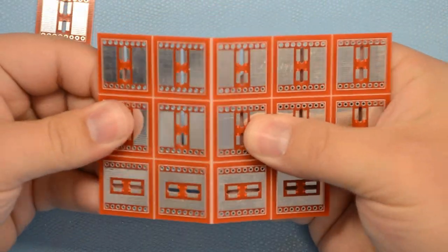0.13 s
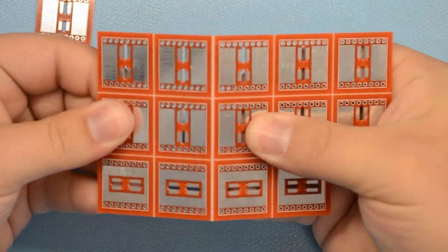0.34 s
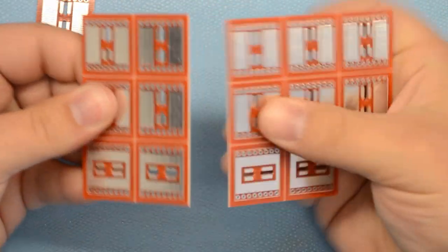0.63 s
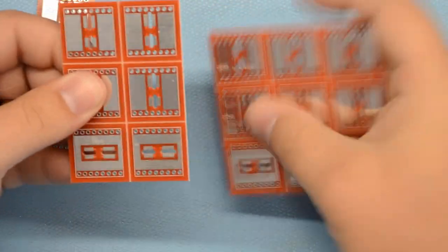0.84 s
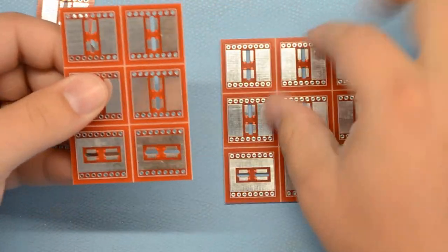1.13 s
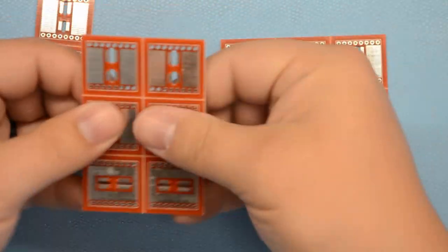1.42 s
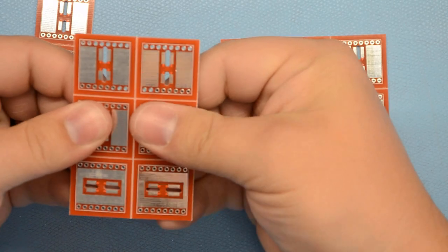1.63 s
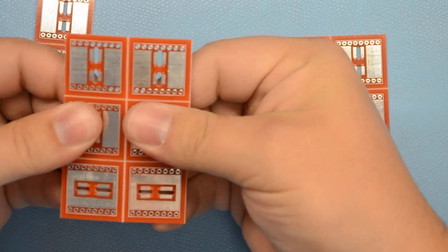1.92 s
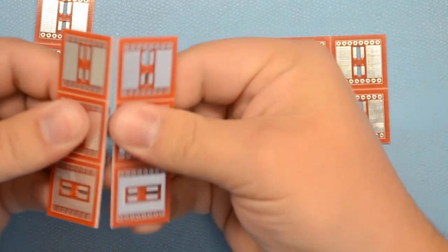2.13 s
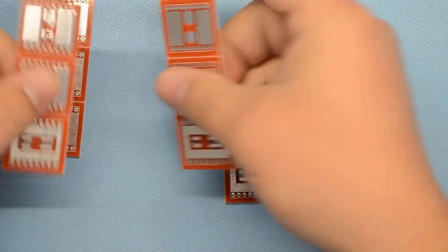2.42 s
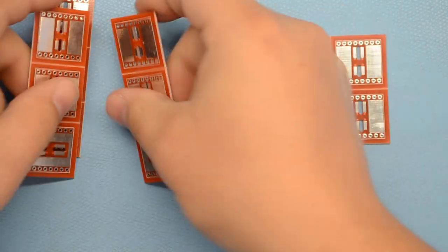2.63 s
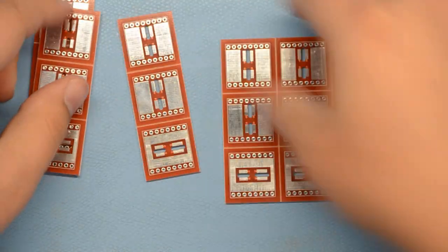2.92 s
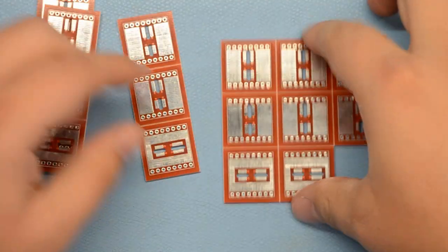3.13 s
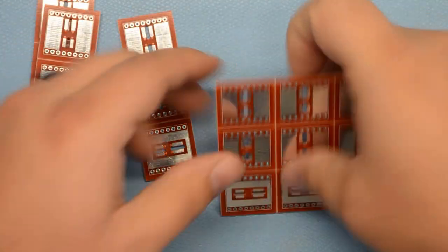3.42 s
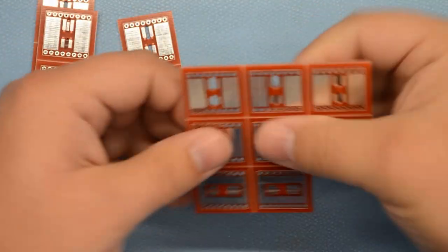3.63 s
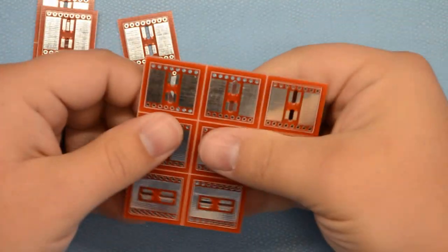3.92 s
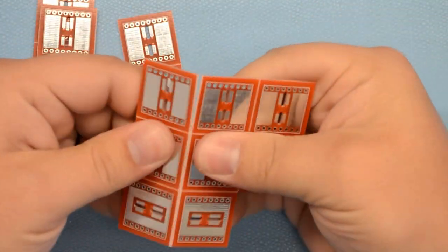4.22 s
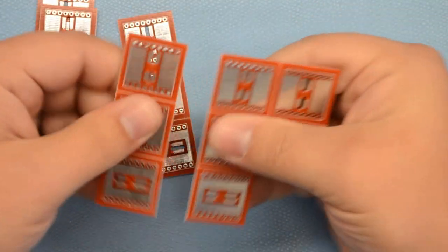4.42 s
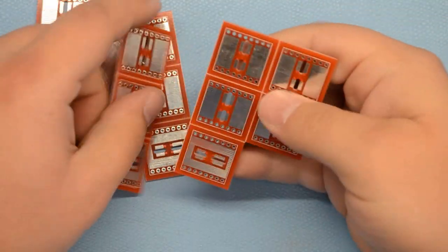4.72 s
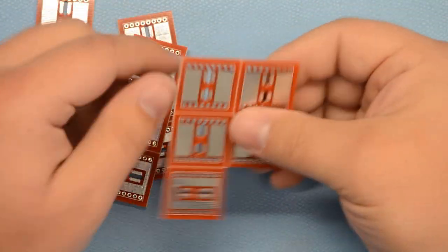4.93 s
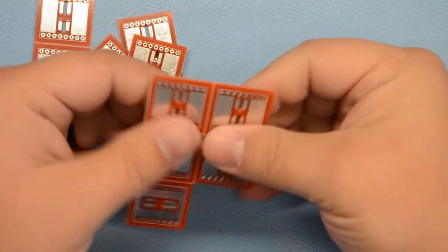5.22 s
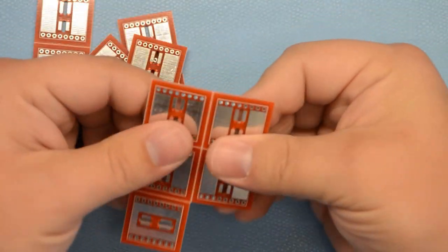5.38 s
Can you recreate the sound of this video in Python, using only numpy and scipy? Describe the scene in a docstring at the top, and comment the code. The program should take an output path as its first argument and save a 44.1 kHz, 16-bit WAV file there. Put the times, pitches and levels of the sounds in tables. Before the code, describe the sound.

Fibreglass circuit board panel is snapped by hand with sharp dry cracks, the broken strips slapping and clattering onto a table in a small room.

```python
"""Snapping a panel of circuit boards

At a table in a small dry room, a small microphone close by: hands bend a fibreglass panel until it cracks
along its scored lines. Cracks and landing strips are rough pushes that ring the board and the room;
tearing fibres, sliding skin and scraping boards are random clicks under swelling gains. Brief tones and
a lasting table ring are narrow noise, thuds and chimes are decaying sines, ventilation is coloured noise.
"""
import sys
import numpy as np
from scipy import signal
from scipy.fft import rfft, irfft, next_fast_len
from scipy.io import wavfile
from scipy.ndimage import uniform_filter1d

SR = 44100
rng = np.random.default_rng(int(sys.argv[2]) if len(sys.argv) > 2 else 0)


def convert_level_to_amplitude(level_db):
    """Map a level in decibels to its linear amplitude factor."""
    exponent = np.asarray(level_db, float) / 20
    return 10 ** exponent


def dump(signal):
    """Clip the signal to [-1, 1] and save it as 16-bit WAV at the path in sys.argv[1]."""
    limited = np.clip(np.atleast_2d(signal).T, -1, 1)
    pcm = np.round(limited * 32767).astype(np.int16)
    wavfile.write(sys.argv[1], SR, pcm)


N = 244755
T = np.arange(N) / SR
CENTRES = 100 * 2 ** np.arange(0, 7.5, .5)  # half-octave bands, Hz


def shape(x, gain_at):
    """Filter by a gain given as a function of frequency."""
    size = next_fast_len(len(x) + 4096)
    hz = np.arange(size // 2 + 1) * SR / size + 1e-3  # keeps the logarithm finite at 0 Hz
    return irfft(rfft(x, size) * gain_at(hz), size)[:len(x)]


def colour(points):
    """Gain joined by straight lines over log frequency, from (Hz, dB) points."""
    hz, db = np.transpose(points)
    return lambda f: convert_level_to_amplitude(np.interp(np.log(f), np.log(hz), db))


def bumps(peaks):
    """Gain of a few bell-shaped peaks or dips, each (Hz, width Hz, dB)."""
    return lambda f: convert_level_to_amplitude(sum(db / (1 + (2 * (f - hz) / width) ** 2) for hz, width, db in peaks))


def resonate(x, peaks):
    """Causal bell-shaped boosts and cuts, each (Hz, width Hz, dB)."""
    for hz, width, db in peaks:
        x = x + (convert_level_to_amplitude(db) - 1) * signal.lfilter(*signal.iirpeak(hz, hz / width, SR), x)
    return x


def band(x, lo_hz, hi_hz):
    """Causal band-pass."""
    return signal.sosfilt(signal.butter(2, [lo_hz, hi_hz], "band", fs=SR, output="sos"), x)


def unit(x):
    """Scale to rms 1."""
    return x / np.sqrt(np.mean(x ** 2))


def energy(x, db):
    """Scale to an energy level."""
    return x * convert_level_to_amplitude(db) / np.sqrt(np.sum(x ** 2))


def peak(x, db):
    """Scale to a peak level."""
    return x * convert_level_to_amplitude(db) / np.abs(x).max()


def add(out, s, x):
    """Mix a sound in at a time."""
    i = int(s * SR)
    out[i:i + len(x)] += x[:N - i]


# Tone of the room's moving air. Each row: frequency in Hz, relative level in dB.
AIR_COLOUR = [(15, -33), (25, -18), (59, 1), (92, -0.5), (236, -5), (263, -3.5), (818, -2.5), (887, -6.5),
              (962, -7.5), (1610, -5.5), (2050, -9), (2410, -8.5), (5570, -20), (8140, -25), (16000, -40)]
# Broad resonances of that air. Each row: frequency in Hz, width in Hz, boost in dB.
AIR_RESONANCES = [(60, 9.6, 1), (244, 33, 7.5), (775, 50, 2), (1079, 81, 9), (2065, 190, 9.5)]


def air():
    """Steady ventilation hiss: coloured noise with a few broad resonances."""
    hiss = shape(rng.standard_normal(N), colour(AIR_COLOUR))
    return convert_level_to_amplitude(-61) * unit(shape(hiss, bumps(AIR_RESONANCES)))


def grains(per_s, spread_db):
    """Random clicks of uneven size, rms 1."""
    happens = rng.random(N) < per_s / SR
    size = rng.standard_normal(N) * convert_level_to_amplitude(spread_db * rng.exponential(size=N))
    return unit(happens * size)


def stroke(start, length, db, rise, fall):
    """Gain that rises 30 dB to the start, sags as the motion slows and falls 30 dB after the end."""
    slowing_db_per_s = 36.5
    t = T - start
    slope = 30 * (np.minimum(t, 0) / rise - np.maximum(t - length, 0) / fall)
    return convert_level_to_amplitude(db + slope - slowing_db_per_s * np.clip(t, 0, length))


def judder():
    """Uneven pressure: random gain steps, smoothed at their joins."""
    spread_db, steps_per_s = 3.5, 45
    k = int(SR / steps_per_s)
    steps = np.repeat(rng.standard_normal(N // k + 1), k)
    return convert_level_to_amplitude(spread_db * uniform_filter1d(steps, k // 2)[:N])


LIFT_S = .05  # time for skin or board to fade 30 dB after a stroke

# Fingers sliding on the boards. Each row: start in seconds, length in seconds, level at the start in dB.
SLIDES = [(.01, 0.044, -74), (.14, 0.088, -71), (.37, 0.074, -75), (.69, 0.033, -62.5), (.78, 0.089, -66.5),
          (.95, .11, -58), (1.2, 0.18, -68), (1.735, 0.013, -70), (1.79, 0.16, -73), (2.18, .12, -80),
          (2.33, .28, -68.5), (2.62, 0.096, -78.5), (2.725, .03, -69.5), (3.043, .015, -74),
          (3.082, 0.018, -73), (3.138, 0.061, -68), (3.25, 0.088, -74), (3.345, 0.096, -67.5),
          (3.47, 0.018, -55.5), (3.53, 0.18, -72), (3.77, 0.046, -75), (3.9, .04, -71),
          (4.25, 0.051, -52.5), (4.45, 0.046, -82), (4.505, 0.029, -69.5), (4.55, 0.093, -77),
          (4.88, 0.074, -66), (5.03, 0.018, -58), (5.205, 0.013, -72), (5.37, 0.068, -77.5)]
# Fibres tearing ever louder as a bend tightens.
# Each row: time of the break in seconds, level there in dB, build-up (the last 30 dB) in seconds.
BENDS = [(0.083, -56, 0.044), (0.491, -55.5, 0.05), (1.995, -60, 0.1), (4.182, -49, 0.13),
         (5.471, -57, 0.055)]
# Tone of fibres and skin heard close. Each row: frequency in Hz, relative level in dB.
RUB_COLOUR = [(300, -41.5), (1500, -9.5), (3000, -14.5), (6000, 1.5), (8500, 3), (12000, -20.5),
              (16000, -28.5)]


def rubbing():
    """Fine crackle of tearing fibres and sliding skin: dense clicks under swelling gains."""
    crackle = unit(shape(grains(per_s=9000., spread_db=1.5), colour(RUB_COLOUR)))
    tearing = sum(stroke(s, 0, db, rise=build, fall=.037) for s, db, build in BENDS)
    skin = judder() * sum(stroke(*row, rise=.05, fall=LIFT_S) for row in SLIDES)
    return crackle * (tearing + skin)


# Fall of the room's reflections. Each row: frequency in Hz, time to fall 60 dB in seconds.
ROOM_T60 = [(150, .22), (500, 0.22), (1400, 0.15), (3700, .14), (8000, 0.14), (13000, 0.042)]


def diffuse(t):
    """Reflections by half octave, energy 1 each: quick to build up, and fading at each band's own rate."""
    onset_ms = 0.28
    hz, t60 = np.transpose(ROOM_T60)
    decay = convert_level_to_amplitude(-60 * t / np.interp(np.log(CENTRES), np.log(hz), t60)[:, None])
    noise = rng.standard_normal((len(CENTRES), len(t)))
    bands = np.array([band(v, f / 1.2, f * 1.2) for v, f in zip(noise, CENTRES)])
    tail = bands * decay * (1 - np.exp(-t / (onset_ms / 1000)))
    return tail / np.sqrt(np.sum(tail ** 2, axis=1, keepdims=True))


def room(x):
    """The small room's answer to the sustained sounds and chimes: one diffuse tail."""
    return signal.fftconvolve(x, energy(diffuse(T[:SR // 4]).sum(0), -8.5))[:N]


def tint(push, gain_at, size=4096):
    """Give a short push a set energy per half octave with a causal (minimum-phase) filter."""
    spectrum = rfft(push[:size], size)
    hz = np.arange(1, len(spectrum) + 1) * SR / size
    own = np.sqrt(uniform_filter1d(np.abs(spectrum) ** 2, size=60))
    # Even energy per half octave falls as 1 / sqrt(Hz); below the lowest band it rolls off.
    wanted = gain_at(hz) * np.minimum(hz / CENTRES[0], 1) / np.sqrt(hz)
    cepstrum = irfft(np.log(wanted / own), size)
    fold = np.r_[1, 2 * np.ones(size // 2 - 1), 1, np.zeros(size // 2 - 1)]
    tinted = irfft(spectrum * np.exp(rfft(cepstrum * fold)), size)
    return np.pad(tinted, (0, len(push) - size))


def ring(modes, push):
    """Damped modes struck by a push; each blow lands elsewhere, so strength, sign and pitch vary."""
    hz, db, t60 = np.transpose(modes)[:, :, None]
    strength, detune, sign = rng.standard_normal((3, len(modes), 1))
    t = T[:SR // 16]
    tone = np.sin(2 * np.pi * hz * (1 + 0.012 * detune) * t)
    response = convert_level_to_amplitude(db + 0.62 * strength) * tone * convert_level_to_amplitude(-60 * t / t60)
    return signal.fftconvolve(push, (np.sign(sign) * response).sum(0))[:len(push)]


# Bending modes of a board. Each row: frequency in Hz, level in dB, time to fall 60 dB in seconds.
BOARD = [(430, -8, .03), (610, -5, .03), (720, -2, .03), (790, -1, .035), (965, -1, .04), (1075, -1, .035),
         (1200, -2, .03), (1320, -2, .03), (1450, -2, .03), (1620, -1, .035), (1700, -3, .03),
         (1840, -3, .03), (2080, -5, .03), (2250, -7, .025), (2490, -6, .025), (2880, -7, .025),
         (3200, -9, .02), (3650, -8, .02), (4000, -10, .02), (4300, -11, .02), (4900, -14, .02)]


def blows(events, ring_db):
    """Each blow is a short rough push: thump, crack and ring of the board, and reflections from where it fell."""
    echo_db = -2.5
    out, t = np.zeros(N), T[:SR // 4]
    for s, db, thump_db, body_db, treble_db, ms in events:
        tau = np.clip(ms, .2, 3.5) / 1000
        push = rng.standard_normal(len(t)) * np.exp(-t / tau) * np.minimum(t / 0.00078, 1)
        gain_at = colour([
            (100, thump_db + 2.5), (350, thump_db + 15),
            (900, body_db + 11), (1800, body_db + 14.5), (3500, 1.6),
            (6400, treble_db + 14.5), (9000, treble_db + 14),
            (12800, treble_db - 10.0), (16000, treble_db - 12.5)])
        direct = energy(tint(push, gain_at), 0) * np.linalg.norm(gain_at(CENTRES))
        board = energy(band(ring(BOARD, push), 270.0, 12000.0), body_db + ring_db)
        echo = convert_level_to_amplitude(echo_db) * gain_at(CENTRES) @ diffuse(t)
        add(out, s, convert_level_to_amplitude(db) * (direct + board + echo))
    return out


# Fractures along a score line. Each row: start in seconds, level in dB, board ring in dB, treble in dB,
# decay time of the burst in ms (held within 0.2 to 3.5 when played).
CRACKS = [(.087, -32.5, -40.5, -0.5, 4.2), (0.0906, -36, -22, 7.5, 3.2), (.0952, -26.5, -18, -11, .56),
          (.175, -64.5, -16, 10, .6), (0.491, -51, -15, 8, 4.8), (.499, -30, -17, -13.5, 6.3),
          (.506, -29, -20, -10.5, 4.1), (.512, -34, -18, -23, 1.5), (1.999, -41, -15, -4.5, .9),
          (2.0043, -4.5, -16.5, -7, .56), (2.021, -11, -20.5, -2.5, 1.6), (4.138, -44.5, -15.5, -6, .63),
          (4.154, -43.5, -17.5, -11.5, 0.56), (4.163, -38, -12.5, -6.5, 2.4), (4.178, -42, -15.5, -16, 3.),
          (4.184, -32.5, -15, -4, 2.1), (4.1887, -17.5, -5, -4, 0.64), (4.217, -26, -15.5, -6.5, 2.7),
          (4.221, -7.5, -17, -9.5, 0.81), (4.280, -34, -18.5, -5, 3), (4.295, -35.5, -15.5, -16, 0.71),
          (4.312, -37, -18, -17, 0.76), (4.501, -29, -21.5, -13.5, 1.1), (5.019, -53, -7, -7, 0.75),
          (5.0435, -43.5, -8.5, -12.5, 2), (5.4772, -6, -15.5, -5.5, .84), (5.4908, -11, -13, -5.5, 1.1)]
# Broad resonances of a board held at both ends. Each row: frequency in Hz, width in Hz, boost in dB.
CRACK_TONE = [(1080, 440, 1), (1730, 320, -1.5), (2810, 590, 4), (3740, 660, -4), (10000, 1200, 1.5),
              (11310, 1200, -4.5)]


def cracks():
    """A board breaking in the hands: sharp pushes with little thump, coloured by the held board."""
    thump_db = -31.5
    events = [(s, db, thump_db, *rest) for s, db, *rest in CRACKS]
    return resonate(blows(events, ring_db=10), CRACK_TONE)


# Hands and boards jolting the table under the microphone. Each row: start in seconds, level in dB.
THUDS = [(0.092, -48), (0.892, -53), (1.07, -39), (2.003, -43.5), (3.051, -56), (3.087, -49.5),
         (4.185, -66), (5.475, -44)]


def thuds():
    """The table top's low bounce, carried straight to the microphone: a decaying sine."""
    bounce_hz, t60_s = 60., 0.091
    out, t = np.zeros(N), T[:SR // 4]
    for s, db in THUDS:
        add(out, s, convert_level_to_amplitude(db) * np.sin(2 * np.pi * bounce_hz * t) * convert_level_to_amplitude(-60 * t / t60_s))
    return out


# Brief narrow wavering tones, one or several at once.
# Each row: start in seconds, length in ms, list of tones (frequency in Hz, rms in dB before the swell).
TONES = [(0.678, 50.2, [(6300, -55.5)]), (0.975, 85., [(2600, -60), (3050, -58)]),
         (3.409, 55.8, [(4400, -66)]), (3.462, 40., [(1250, -52.5), (3400, -60), (4300, -59), (7000, -74)])]


def tones():
    """Brief narrow wavering tones under a smooth swell: band-passed noise."""
    out = np.zeros(N)
    for s, ms, pitches in TONES:
        n = int(ms * SR / 1000)
        for hz, db in pitches:
            settled = band(rng.standard_normal(2 * n), hz * .94, hz * 1.06)[n:]
            add(out, s, convert_level_to_amplitude(db) * np.hanning(n) * unit(settled))
    return out


# Strips landing on the table or the pile. Each row: start in seconds, level in dB, low thump in dB,
# board ring in dB, treble in dB.
TAPS = [(.8878, -25, -3.5, -9.5, -18.5), (.896, -34, 7.5, -22, -26), (.945, -45.5, -9.5, -2, -8),
        (1.0105, -36.5, -19, -5.5, -23.5), (1.022, -37.5, -8, -7, -26), (1.0708, 9, -29.5, -9.5, -28.5),
        (1.0742, -2.5, -26.5, -4.5, -30), (2.629, -48.5, -12, -2.5, -30), (2.728, -44.5, -17.5, -0.5, -29),
        (2.752, -29, -9, -5, -18.5), (2.761, -4, -22.5, -6, -20), (2.7712, -8, -24, -5, -6.5),
        (3.047, -35, -3.5, -13, -26.5), (3.083, -35, -12.5, -21.5, -20.5), (3.140, -50.5, -4.5, -10.5, -7),
        (3.3445, -41, -1.5, -6, -27), (4.705, -33.5, -11.5, 0, -21), (4.722, -24, -19, -18, -10),
        (4.7245, -16.5, -22.5, -22, -14.5), (4.754, -24.5, -13, -3, -8.5), (4.7655, -13, -21, -8.5, -5),
        (4.774, -22.5, -27, -1, -7), (4.82, -29.5, -22, 1.5, -3.5)]
# Broad resonances of a board lying on the mat. Each row: frequency in Hz, width in Hz, boost in dB.
SLAP_TONE = [(150, 120, -3.5), (545, 250, 2.5), (1000, 400, 3), (2300, 500, -4.5), (3400, 800, 2)]


def landings():
    """Dropped strips: pushes coloured by the board on the mat; softer landings touch longer, within limits."""
    contact_ms, contact_ms_per_db = 1.3, 0.74  # the first at 0 dB, before blows() limits it
    events = [(*row, contact_ms - contact_ms_per_db * row[1]) for row in TAPS]
    return resonate(blows(events, ring_db=13), SLAP_TONE)


def table_ring():
    """Each landing leaves a narrow, wavering, slow-dying ring in the table, heard for up to a second."""
    ring_hz, width_hz, t60_s = 955., 18, 2.4
    ring_db = -69  # relative to the landing
    level, t = np.zeros(N), T[:SR]
    for s, db, *_ in TAPS:
        add(level, s, convert_level_to_amplitude(db + ring_db - 60 * t / t60_s))
    return level * unit(band(rng.standard_normal(N), ring_hz - width_hz / 2, ring_hz + width_hz / 2))


# Boards scraping over the table mat. Each row: start in seconds, length in seconds, level at the start in dB.
SCRAPES = [(0.897, 0.0076, -45), (0.948, .04, -55.5), (1.012, .045, -52.5), (2.627, 0.06, -56.5),
           (2.73, 0.01, -47.5), (3.046, 0.17, -59.5), (3.338, 0.082, -58), (3.5, 0.12, -79),
           (4.709, 0.026, -43.5), (4.79, 0.043, -42.5), (4.838, 0.035, -53.5)]
# Tone of that scrape. Each row: frequency in Hz, relative level in dB.
SCRAPE_COLOUR = [(100, -10), (300, -3), (900, 8.5), (1800, -2), (2900, -7), (5000, -17), (16000, -51.5)]


def scraping():
    """The duller scrape of boards over the mat: sparser, more uneven clicks under swelling gains."""
    scrape = unit(shape(grains(per_s=1500., spread_db=2.5), colour(SCRAPE_COLOUR)))
    return scrape * judder() * sum(stroke(*row, rise=.012, fall=LIFT_S) for row in SCRAPES)


# A strip striking another edge-on makes it chime. Each row: start in seconds, peak level in dB.
CLINKS = [(4.7238, -26.5), (4.7541, -21), (4.7681, -15.5), (4.8209, -29.5)]
# Lengthwise modes of a strip. Each row: frequency in Hz, level in dB, time to fall 60 dB in seconds.
EDGE = [(7150, -2, .02), (7400, 0, .025), (7700, -2, .02), (8500, -2, .02), (8750, -1, .025),
        (9050, -4, .02)]


def clinks():
    """The high modes of a strip hit on its edge, kept going by its chatter on the pile."""
    out, t = np.zeros(N), T[:SR // 6]
    for s, db in CLINKS:
        chatter = rng.standard_normal(len(t)) ** 3 * np.exp(-t / .012)  # cubed: uneven blows
        add(out, s, peak(ring(EDGE, chatter), db))
    return out


def scene():
    """Blows, chimes, tones and friction close by, in a small room with moving air."""
    hits = cracks() + landings()  # these bring their own reflections
    near = rubbing() + tones() + scraping() + clinks()
    return (hits + near + room(near) + thuds() + table_ring() + air())[None]


def band_limit(x):
    """A steep low-pass at the top of the band."""
    return signal.sosfilt(signal.butter(12, 16370, fs=SR, output="sos"), x)


# Dips of the microphone housing. Each row: frequency in Hz, width in Hz, share removed from 0 to 1.
MIC_DIPS = [(5764, 520, 1), (6790, 300, .5)]


def record(dry):
    """The microphone housing dips the lower treble; peaks beyond full scale clip."""
    x = dry
    for hz, width, share in MIC_DIPS:
        x = x - share * signal.lfilter(*signal.iirpeak(hz, hz / width, SR), x)
    return band_limit(np.clip(x, -1, 1))


dry = scene()
out = record(dry)
dump(out)
```